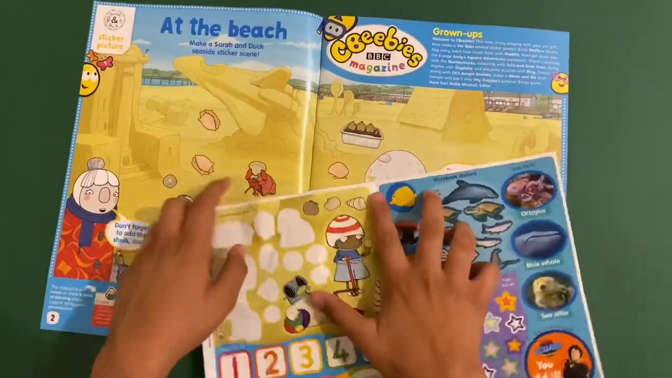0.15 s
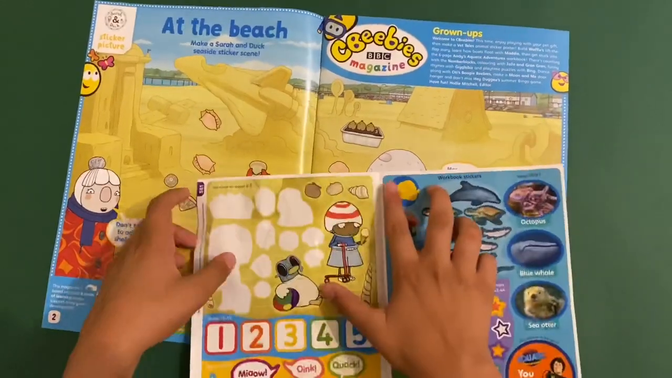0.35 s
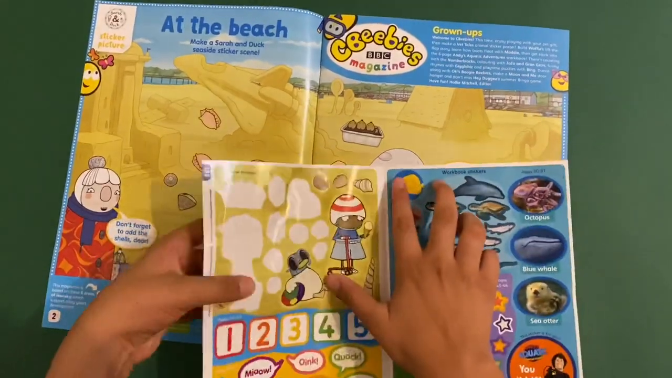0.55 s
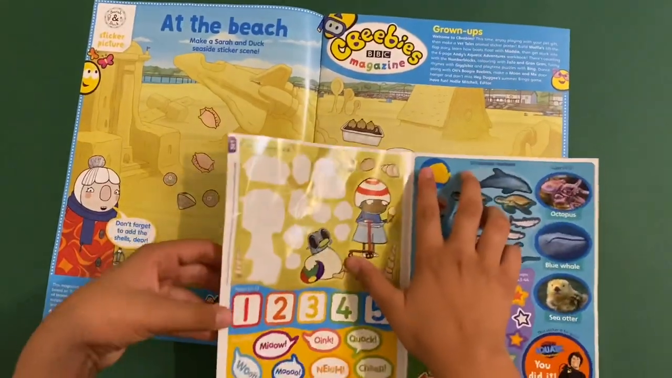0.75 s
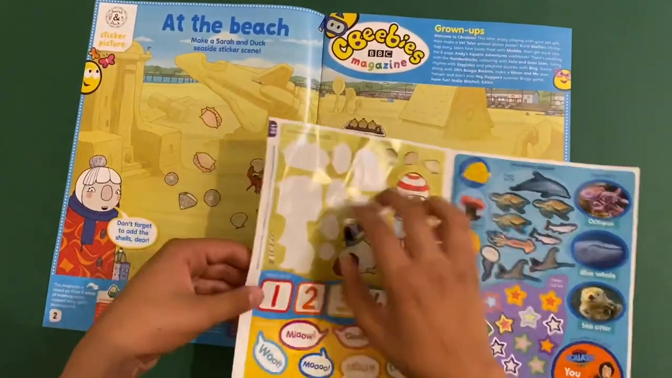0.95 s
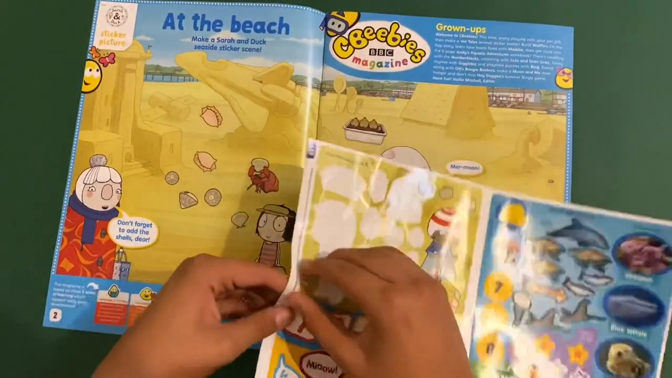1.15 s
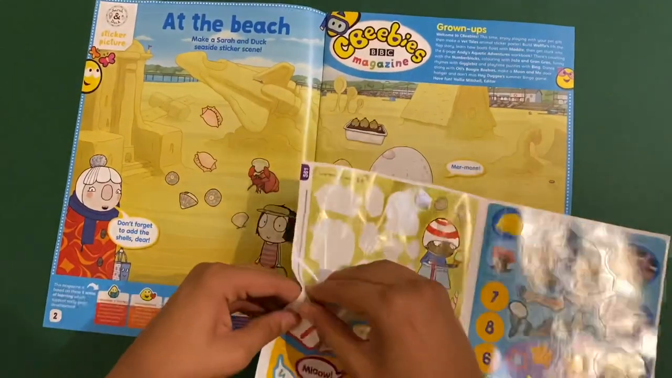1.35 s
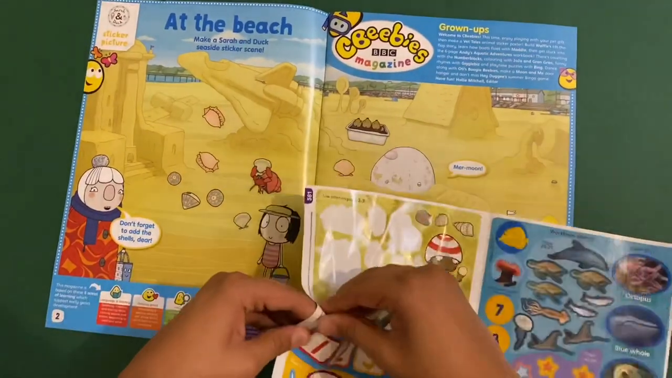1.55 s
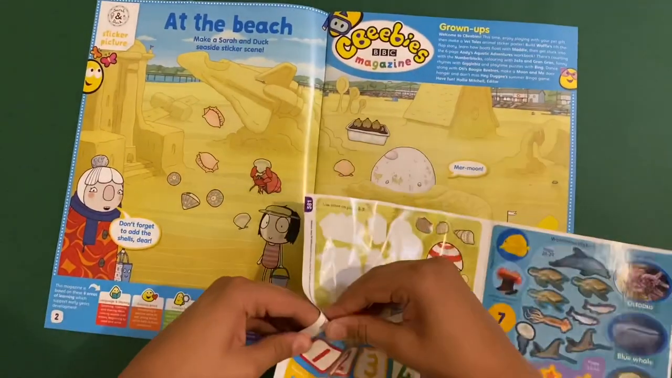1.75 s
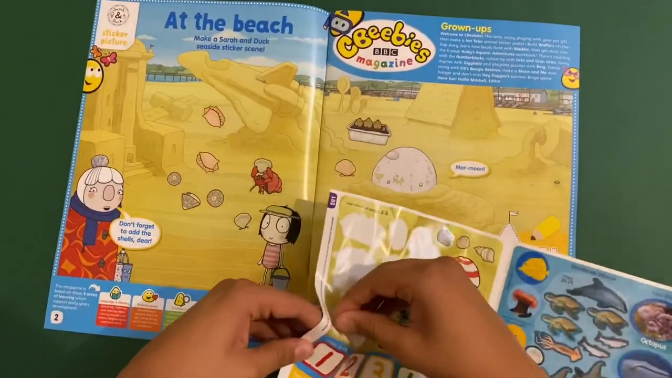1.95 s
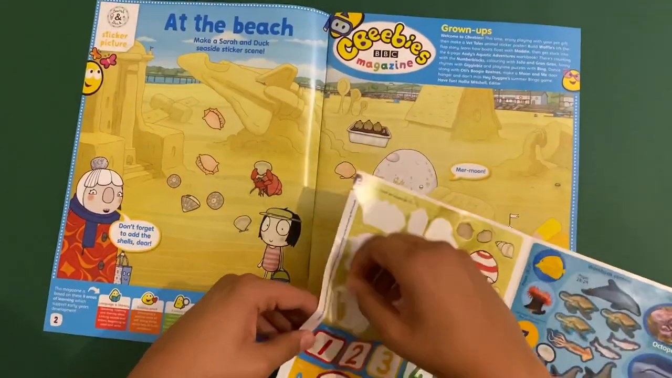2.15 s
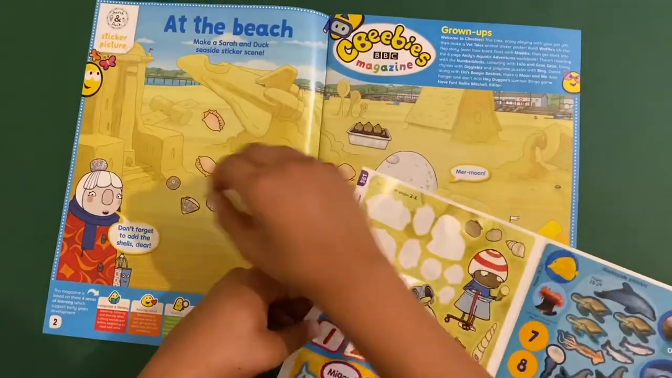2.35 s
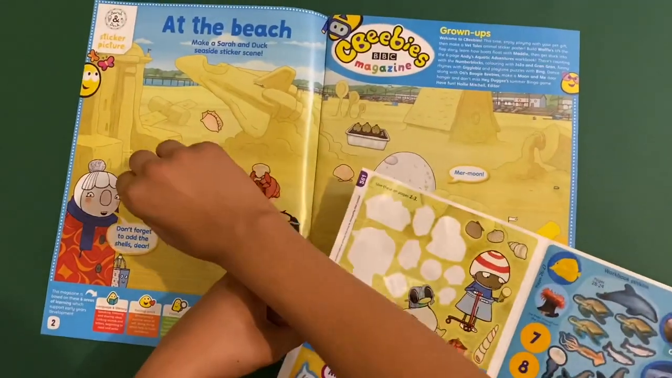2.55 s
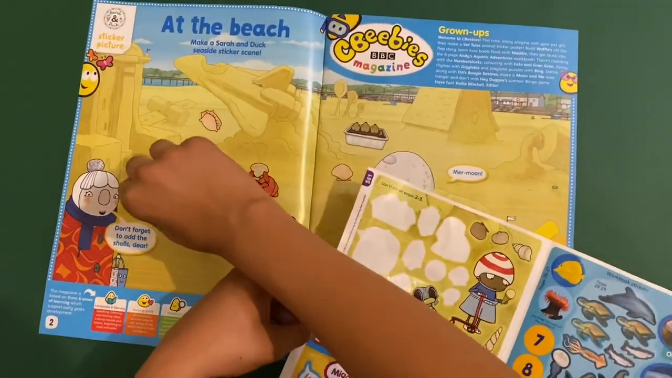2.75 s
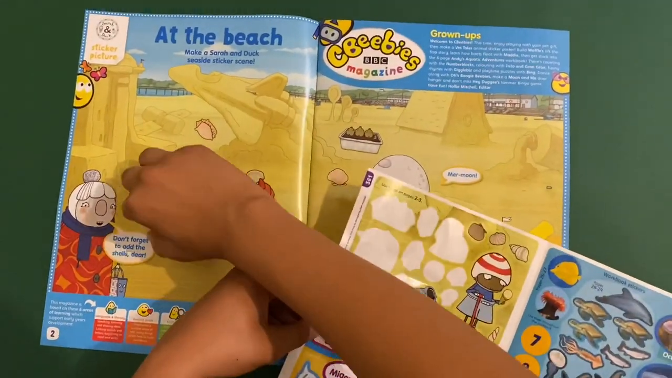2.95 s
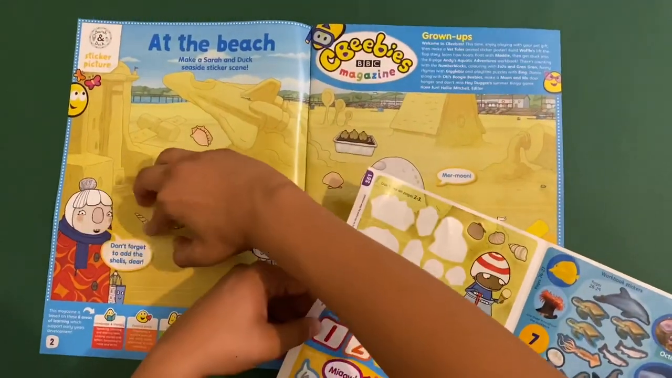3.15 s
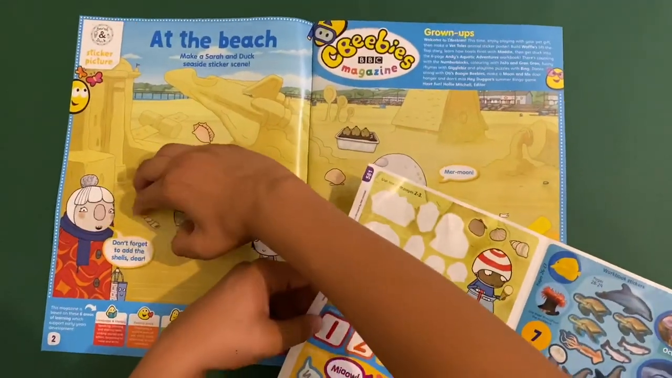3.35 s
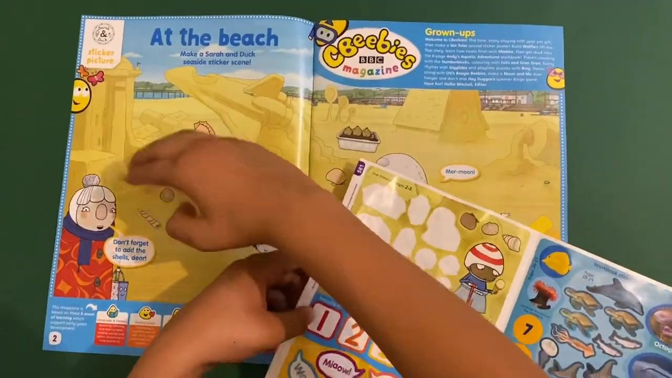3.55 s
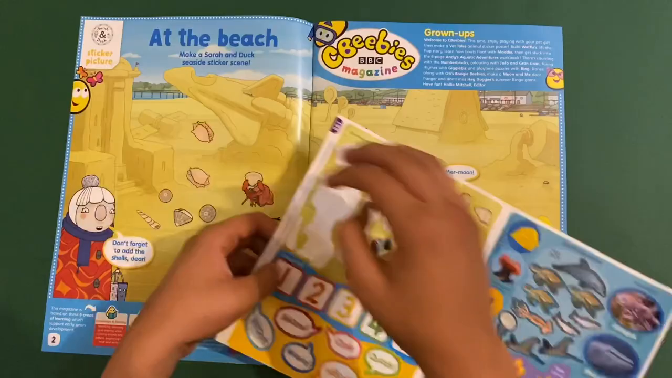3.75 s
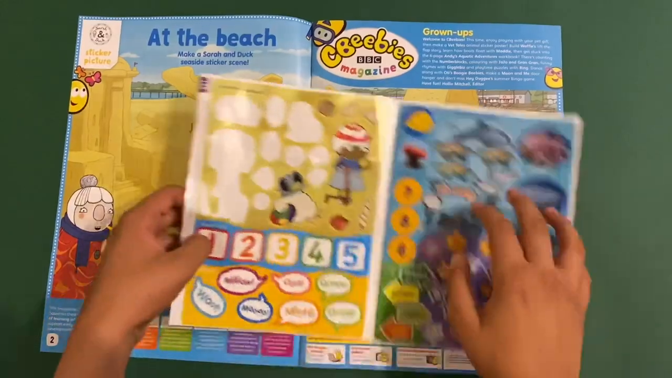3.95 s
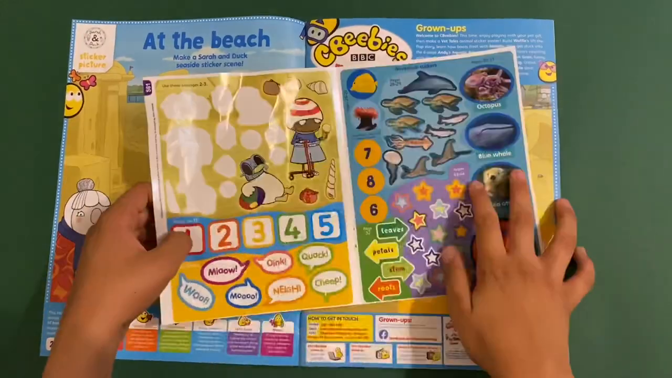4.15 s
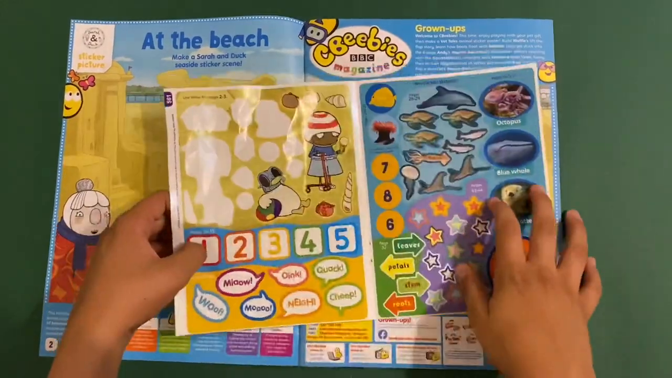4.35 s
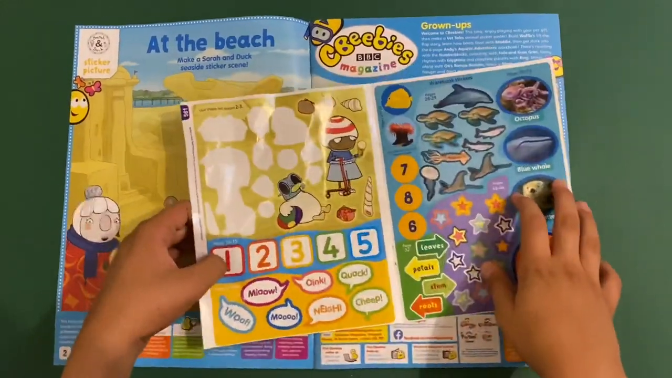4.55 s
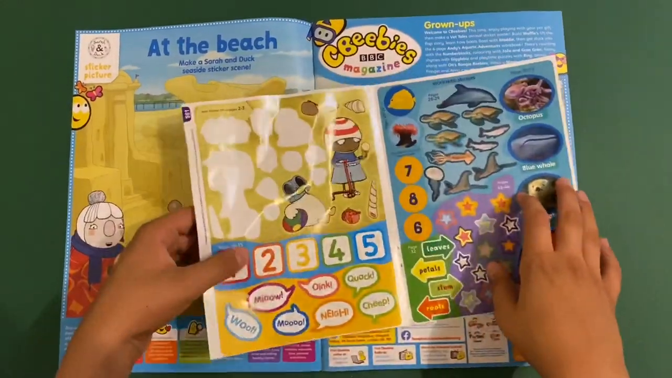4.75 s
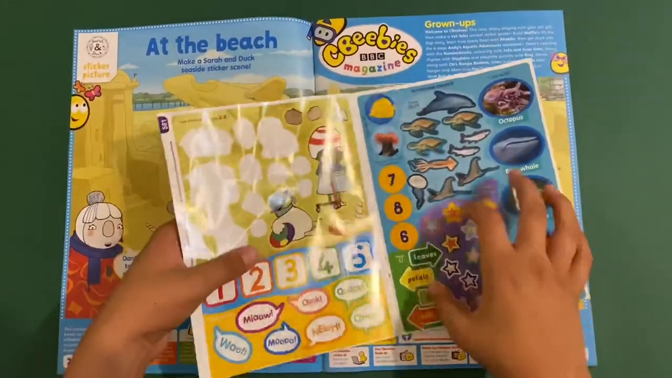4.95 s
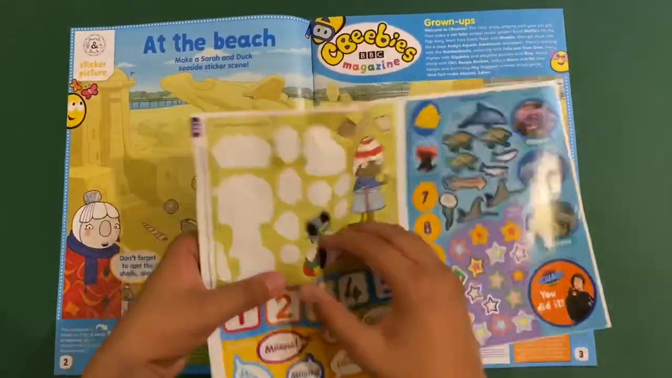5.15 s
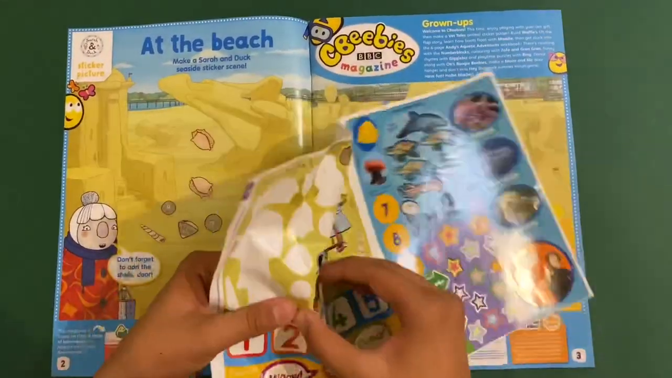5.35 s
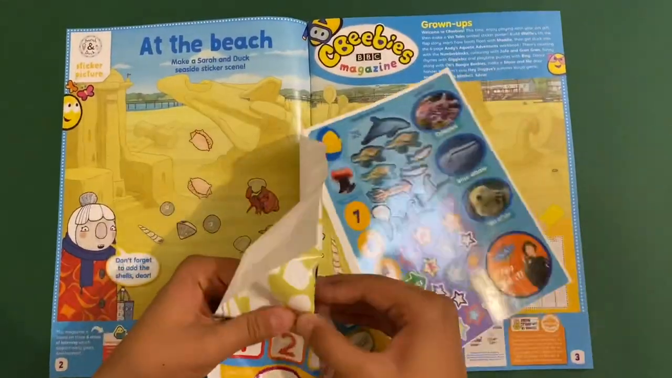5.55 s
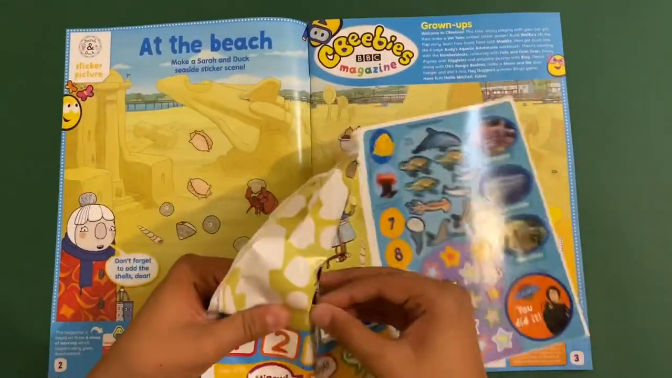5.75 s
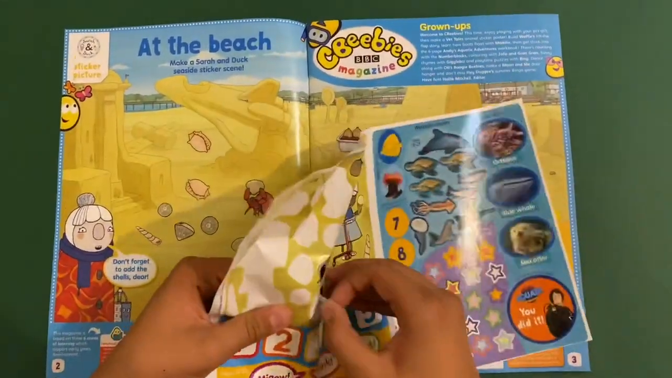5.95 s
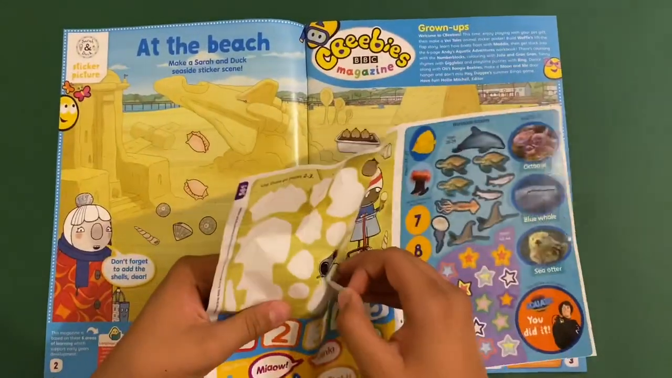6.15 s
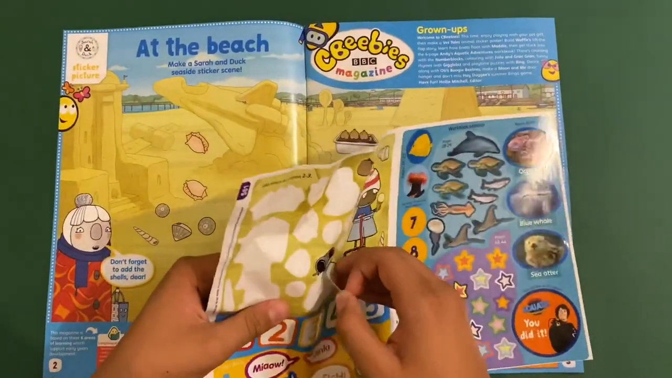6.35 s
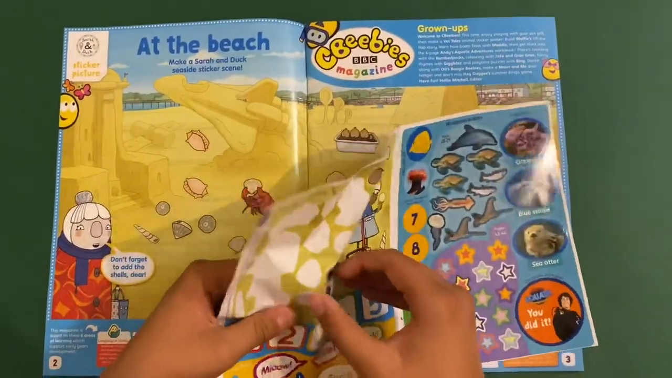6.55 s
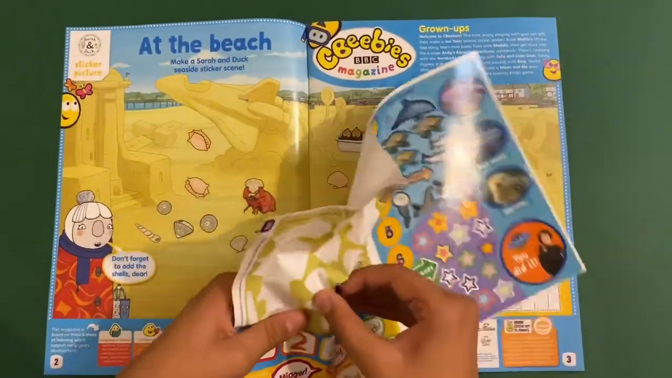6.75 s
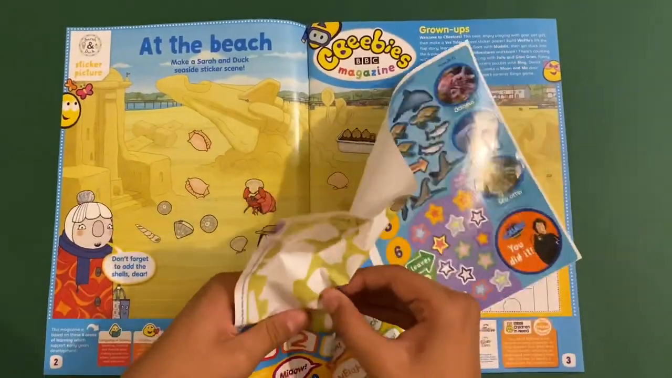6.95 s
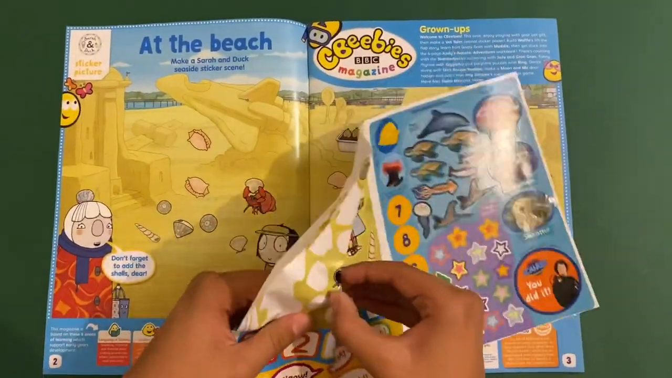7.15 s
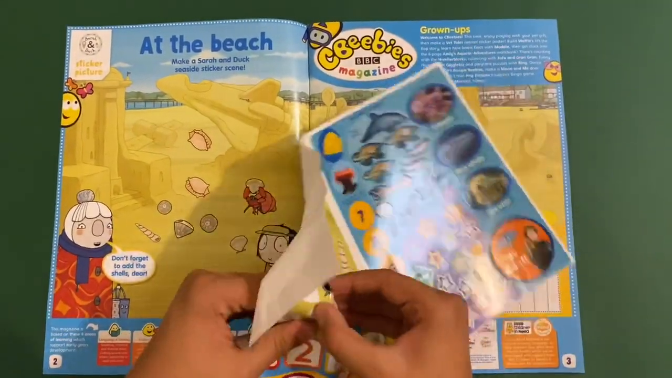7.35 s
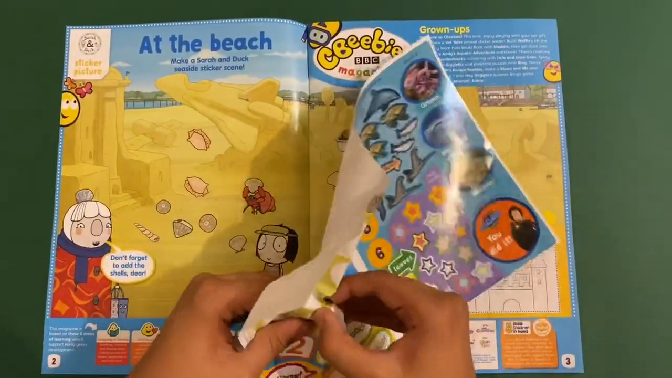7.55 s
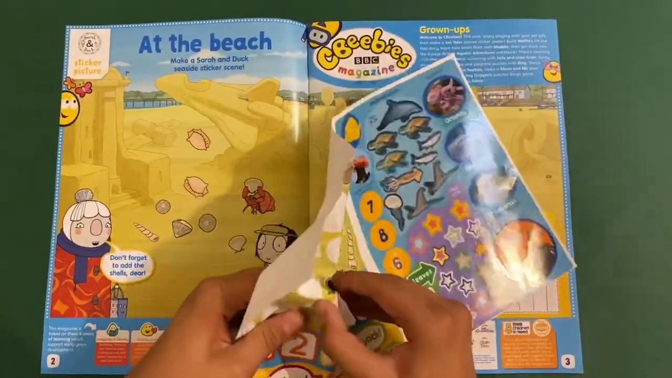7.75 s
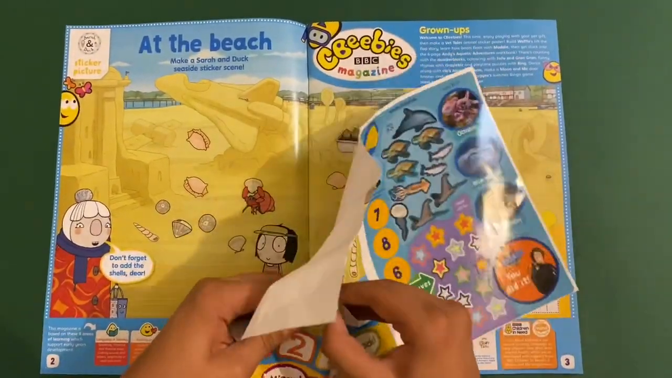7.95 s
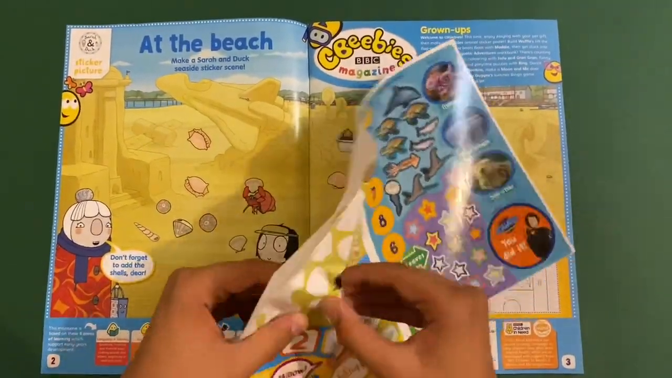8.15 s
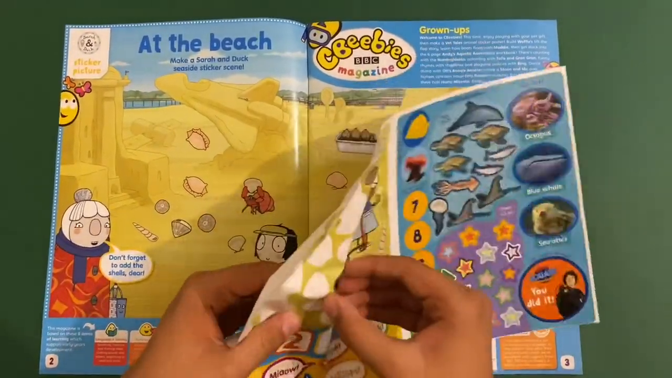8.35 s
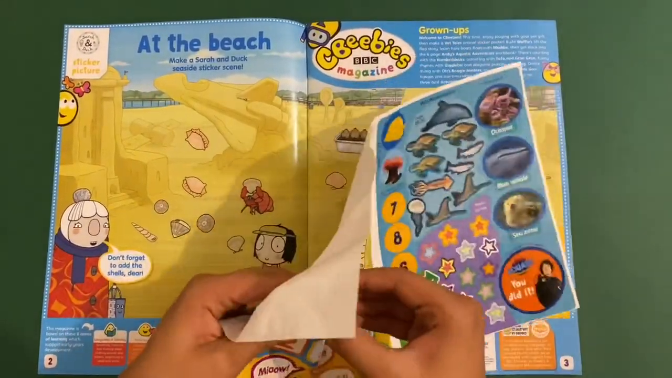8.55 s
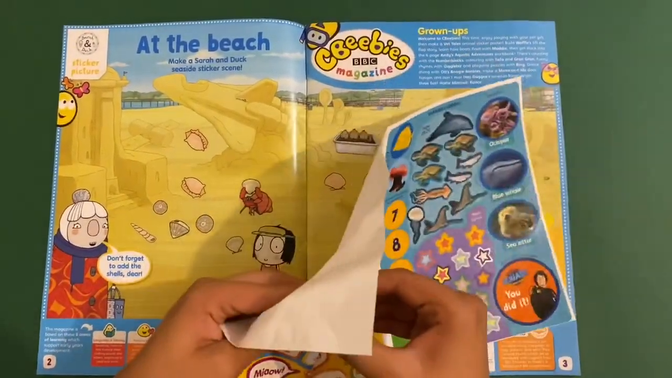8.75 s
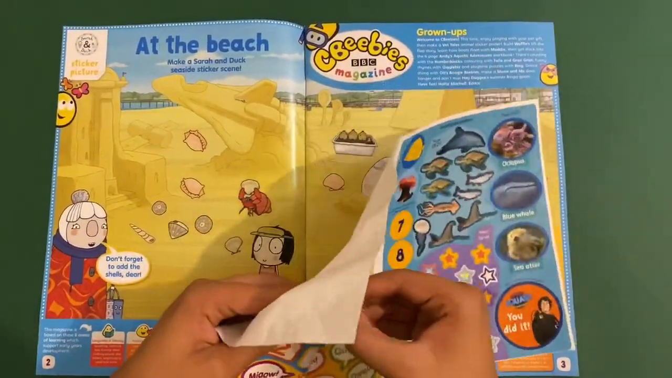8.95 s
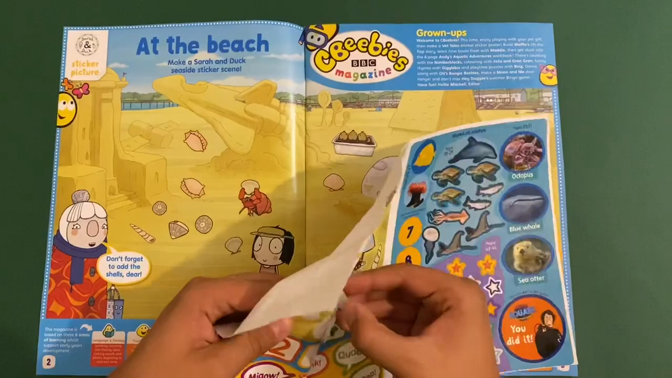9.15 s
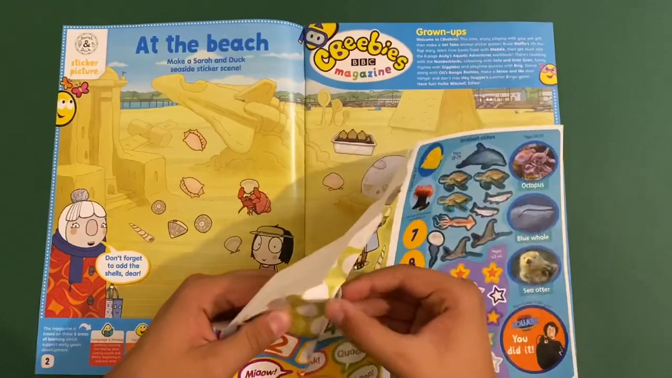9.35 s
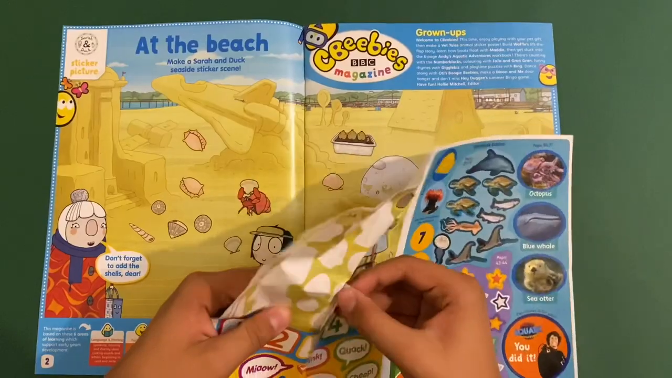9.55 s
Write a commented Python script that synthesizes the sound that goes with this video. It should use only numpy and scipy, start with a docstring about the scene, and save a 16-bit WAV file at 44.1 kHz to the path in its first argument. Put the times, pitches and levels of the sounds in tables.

```python
"""Sticker sheet over a magazine

Hands slide a glossy sticker sheet over an open magazine on a table, peel a sticker, rub it down and pick at the next.
Kinks in the bent sheet snap and flap as short noisy kicks; stick-slip pulse trains creak; thumps are damped swings.
Sliding, scuffing and rubbing are coloured noise with grains. A low rumble and the room's hush lie beneath.
Heard close, in a small quiet room, in stereo whose left and right differ in phase."""
import sys
import numpy as np
from scipy import signal
from scipy.fft import rfft, irfft, next_fast_len
from scipy.io import wavfile

SR = 44100
rng = np.random.default_rng(int(sys.argv[2]) if len(sys.argv) > 2 else 0)


def dump_mix(stems):
    """Bounce the given channels to the path in sys.argv[1] as a 16-bit WAV at rate SR."""
    frames = np.atleast_2d(stems).T  # one column per channel
    limited = np.clip(frames, -1, 1)  # hard clip at full scale
    pcm = np.round(limited * 32767).astype(np.int16)
    wavfile.write(sys.argv[1], SR, pcm)


N = 427750

# the sheet buckles: (t/s, flap level/dB, flap f/Hz, crack level/dB), levels before the trims in snaps()
SNAPS = [(0.0336, -46.5, 1800, -48.5), (0.142, -65, 1910, -65), (0.4131, -46.5, 2700, -62),
         (0.424, -39, 2320, -36.5), (0.4386, -40.5, 1930, -38), (0.445, -52, 1670, -45),
         (0.779, -73, 2510, -39.5), (1.0271, -31.5, 1230, -20.5), (1.137, -61, 1080, -64),
         (1.1716, -45.5, 900, -56), (1.277, -67, 1040, -87), (1.3095, -62, 1214, -78),
         (1.8619, -50, 1780, -38.5), (1.9835, -51.5, 1470, -46.5), (2.128, -64, 2200, -35.5),
         (2.136, -49.5, 2440, -35.5), (2.576, -64, 600, -73), (2.776, -72, 1400, -71),
         (2.901, -63, 480, -68), (3.16, -73, 480, -84), (3.299, -66, 560, -68), (3.422, -57.5, 530, -68),
         (3.454, -59.5, 474, -72), (3.774, -57, 1820, -66), (3.891, -59, 1580, -61),
         (4.858, -58.5, 1230, -51), (4.93, -54, 980, -73), (4.9632, -48.5, 1200, -47.5),
         (5.0872, -47, 1320, -57), (5.113, -36, 1010, -44.5), (5.141, -40.5, 1350, -53.5),
         (5.2197, -39.5, 1010, -44.5), (5.2516, -23, 1245, -13), (5.383, -62, 1180, -51),
         (5.5005, -47, 1010, -85), (5.6516, -51.5, 1140, -50), (5.9134, -49.5, 910, -71.5),
         (5.9332, -54, 1350, -50), (5.948, -49.5, 1500, -41), (6.005, -59.5, 2160, -48),
         (6.095, -47.5, 1210, -38), (6.139, -40.5, 915, -53.5), (6.16, -48, 1410, -39),
         (6.183, -42, 1010, -60), (6.243, -58, 1370, -46), (6.431, -43.5, 1280, -39.5),
         (6.5076, -41, 1210, -37.5), (6.6272, -59.5, 1760, -45), (6.662, -41, 1620, -40),
         (6.679, -42.5, 1270, -40), (6.6875, -34, 1110, -23.5), (6.702, -47, 900, -51),
         (6.715, -43.5, 1300, -59), (6.91, -37, 1190, -45), (6.997, -44.5, 805, -58),
         (7.024, -54, 1390, -44.5), (7.133, -57.5, 1013, -60), (7.286, -37.5, 1990, -38),
         (7.32, -40.5, 1840, -39), (7.344, -50.5, 1420, -59), (7.5827, -35.5, 2360, -15.5),
         (7.622, -37.5, 1480, -46), (7.6452, -35.5, 710, -51), (7.7506, -57, 1100, -50.5),
         (7.88, -61, 1410, -72), (7.9199, -55, 1270, -66), (7.939, -60, 1500, -60),
         (7.972, -54.5, 1300, -52.5), (8.058, -46.5, 1470, -42.5), (8.13, -45, 1280, -50),
         (8.146, -40, 1110, -51), (8.1613, -52, 1360, -34), (8.212, -48, 1080, -46),
         (8.256, -50.5, 1060, -57), (8.278, -50, 1180, -65), (8.312, -36.5, 1090, -33.5),
         (8.3195, -51, 1400, -33), (8.446, -61.5, 900, -66), (8.5302, -42.5, 2080, -35),
         (8.553, -40, 1380, -32.5), (8.562, -32.5, 1320, -22), (8.63, -53, 740, -52),
         (8.6802, -53, 1243, -46.5), (8.709, -59, 1690, -56), (8.862, -58.5, 930, -68),
         (9.0542, -43, 1490, -48), (9.093, -59, 1300, -70), (9.133, -54.5, 1580, -51),
         (9.17, -61, 1114, -55), (9.1836, -58.5, 2450, -54), (9.446, -64, 1830, -52),
         (9.53, -56.5, 1810, -57.5), (9.5573, -53, 2080, -34), (9.5783, -69, 2140, -33.5),
         (9.606, -44, 1290, -36.5), (9.645, -51.5, 1130, -61), (9.6655, -47, 1040, -38)]
# colour of a crack: (f/Hz, level/dB)
CRACK_COLOUR = [(1250, -23.5), (2350, -5.5), (3150, -7), (4150, 4), (5300, -7.5), (7600, -10.5),
                (10100, -9.5), (12400, -14), (15400, -14)]
CRACK_S, AFTERSHOCKS_PER_S = 0.0013, 450
# grit and bounce grow with a kink's level, from this level over this range
SMALL_KINK_DB, KINK_RANGE_DB = -68.5, 23.5


def snaps(flutter_s=0.01, flutter_db=-18, bounce_s=0.0039, bounce_db=-8, side_db=-8, flap_db=3.0, crack_db=-3.0):
    """A kink jumps: crack and flap run through the sheet, crackle on and bounce off the table, more so if big."""
    out = np.zeros((2, N))
    t = np.arange(int(.04 * SR)) / SR
    level_scale = np.sqrt(.007 / .04)  # unit power over 40 ms becomes unit power over 7 ms
    chance = AFTERSHOCKS_PER_S / SR
    for s, level, hz, crack in SNAPS:
        big = np.clip((max(level, crack) - SMALL_KINK_DB) / KINK_RANGE_DB, .3, 1)
        grit_share = .6 * big  # share of power; the rest is one clean kick
        aftershocks = (rng.random(len(t)) < chance) / np.sqrt(chance) * np.exp(-t / flutter_s)
        decay = np.exp(-t / CRACK_S) + from_db(flutter_db) * aftershocks
        grit = rng.standard_normal((2, 2, len(t))) * decay  # (crack or flap, mid or side, time)
        force = grit / np.linalg.norm(grit, axis=-1, keepdims=True)
        force[:, 0] *= np.sqrt(grit_share)
        force[:, 0, 0] += np.sqrt(1 - grit_share)
        lag = int(bounce_s * rng.uniform(0.6, 1.4) * SR) + 1
        force[..., lag:] += big * from_db(bounce_db) * force[..., :-lag]
        sharp, soft = force
        # each crack has a ring of its own
        sharp = sharp + 2 * resonance(sharp, rng.uniform(3000, 10000), 350)
        tick = from_db(crack + crack_db) * mid_side(coloured(sharp, CRACK_COLOUR), side_db)
        body = from_db(level + flap_db) * mid_side(flap(soft, hz), side_db)
        add(out, s, level_scale * bent(tick + body))
    return out


# the soft paper damps the push of a flap above this
PAPER_CUT_HZ = 2250


def flap(force, hz, ring_db=-9, ring_width_hz=110, sheet_db=-10):
    """A small kink flaps higher than a wide one; it rings at its own pitch and stirs the whole sheet."""
    push = resonance(force, hz, .7 * hz)
    push = signal.sosfilt(signal.butter(4, PAPER_CUT_HZ, fs=SR, output="sos"), push)
    own_ring = from_db(ring_db) * rms_one(resonance(push, hz, ring_width_hz))
    sheet_ring = from_db(sheet_db) * rms_one(sheet(push))
    return rms_one(high_pass(rms_one(push) + (own_ring + sheet_ring), min(0.25 * hz, 420)))


# resonances of the held sheet: (f/Hz, width/Hz, level/dB)
SHEET_MODES = [(527, 160, 10.5), (692, 76, 2.5), (878, 68, 1.5), (1470, 28, -5), (1480, 110, -21),
               (2020, 300, -5)]


def sheet(force):
    """The sheet's resonances ring side by side, with alternating signs."""
    return sum((-1) ** k * from_db(db) * resonance(force, hz, width)
               for k, (hz, width, db) in enumerate(SHEET_MODES))


# the arched sheet's main resonance, higher when bent tighter: (t/s, f/Hz)
ARCH = [(0, 1637), (3.749, 1900), (4.9, 1290), (5.6, 1475), (6.101, 900), (7.0, 870), (7.25, 1539),
        (7.89, 1382), (8.27, 1037), (8.5, 1380), (8.879, 965), (9.18, 1350)]


def arch(force, start=0, width_hz=260):
    """The gliding resonance of the arched sheet, driven from time start on."""
    hz = np.interp(start + np.arange(force.shape[-1]) / SR, *np.transpose(ARCH))
    turn = np.exp(2j * np.pi * np.cumsum(hz) / SR)
    # shift the glide down to 0 Hz, smooth it there, shift it back
    smooth = signal.lfilter([1], [1, -np.exp(-np.pi * width_hz / SR)], force / turn + 1e-18)
    ringing = turn * smooth
    return rms_one(high_pass(ringing.real, 440))


# scale of a bending wave's travel time, taken at 1 kHz
TRAVEL_S = 0.002


def bent(x):
    """A bending wave crosses the sheet: treble arrives first, so a click becomes a quick falling chirp."""
    hz = bins_of(x)
    # delay falls as 1 / sqrt(f) and is zero at the top frequency
    turns = TRAVEL_S * (2 * np.sqrt(1000 * hz) - hz * np.sqrt(2000 / SR))
    return filtered(x, -2j * np.pi * turns)


# paper or glue catches and slips, levels before the trims in drags():
# (start t/s, end t/s, sheet level/dB, sheet f/Hz, crackle level/dB, slips per s, irregularity 0-1)
DRAGS = [(0.4216, 0.452, -50.5, 1600, -36.5, 384, 0.38), (3.405, 3.458, -70.5, 900, -68, 135, 0.41),
         (5.114, 5.16, -43, 780, -52, 190, 0.55), (6.108, 6.201, -48.5, 900, -36, 480, 0.42),
         (6.66, 6.722, -49.5, 880, -45, 290, .5), (6.946, 7.002, -48.5, 825, -55, 235, 0.05),
         (7.625, 7.656, -46, 770, -68, 320, 0.65), (8.56, 8.591, -45, 900, -39, 570, 0.64)]
SLIP_S = 0.0008


def drags(speed_up=0.35, arch_db=-3, side_db=-7, sheet_db=4.0, crackle_db=-12.0):
    """Stick and slip: a quickening run of tiny releases drives the sheet; uneven runs crackle, even ones creak."""
    out = np.zeros((2, N))
    for start, end, body, hz, crackle, per_s, irregular in DRAGS:
        length = max(end - start, .005)
        t = np.arange(int((length + .02) * SR)) / SR
        gaps = np.exp(irregular * rng.standard_normal(200))
        progress = np.cumsum(per_s * (1 + speed_up * (t / length - .5))) / SR
        turns = np.searchsorted(np.cumsum(gaps), progress)
        sizes = from_db(10.0 * irregular * rng.standard_normal(len(t)))
        slips = np.diff(turns, prepend=-1) * (t < length) * sizes
        slip_decay = signal.lfilter([1], [1, -np.exp(-1 / (SLIP_S * SR))], slips)
        grit = rms_one(slip_decay * rng.standard_normal((2, len(t))))
        force = rms_one(slips) * [[1], [0]] + irregular * grit
        whole_sheet = rms_one(sheet(force)) + from_db(arch_db) * arch(force, start)
        ringing = flap(force, hz, ring_db=-12) + irregular * whole_sheet
        creak = from_db(body + sheet_db) * mid_side(ringing, side_db)
        fizz = high_pass(resonance(grit, 2000, 5400), 1100)
        fizz = from_db(crackle + crackle_db) * mid_side(fizz, side_db)
        # level holds over the drag itself, without its tail
        add(out, start, np.sqrt(length / t[-1]) * bent(creak + fizz))
    return out


# the sheet or a hand lands and pushes air: (t/s, f/Hz, peak level/dB before trim and table)
THUMPS = [(0.429, 116, -39.5), (0.452, 111, -40.5), (1.031, 508, -25.5), (1.035, 123, -41),
          (2.152, 67.4, -49), (2.305, 75, -54), (3.45, 267, -52.5), (3.992, 99.6, -49.5), (4.487, 270, -50),
          (4.5, 82.4, -53), (4.927, 199, -40), (4.969, 224, -44.5), (5.12, 109.3, -33.5), (5.148, 159, -38),
          (5.2535, 609, -15), (5.913, 154, -56), (6.511, 513, -28.5), (6.688, 214, -35), (7.63, 204, -44),
          (8.214, 142, -42.5), (8.315, 165.5, -32), (8.536, 194, -31.5), (8.554, 187.5, -27)]
# the table rings under a thump: (f/Hz, width/Hz, level/dB)
TABLE_MODES = [(85, 30, -0.5), (159, 17, -11.5), (207, 39, -7.5)]


def thumps(rise_cycles=0.55, decay_cycles=1.5, level_db=-3.0, side_db=-17, low_hz=42):
    """A soft push of air, a few damped swings at neighbouring pitches, sets the table ringing."""
    out = np.zeros((2, N))
    t = np.arange(int(.12 * SR)) / SR
    for s, hz, db in THUMPS:
        swings = sum(weight * np.sin(2 * np.pi * (hz * ratio * t + rng.random((2, 1))))
                     for ratio, weight in [(.62, 0.38), (1, 1), (1.4, 0.42), (2.1, .25)])
        puff = swings * (1 - np.exp(-t * hz / rise_cycles)) * np.exp(-t * hz / decay_cycles)
        add(out, s, from_db(db + level_db) * puff / abs(puff).max() * from_db([[0], [side_db]]))
    table_ring = sum(from_db(db) * resonance(out, hz, width) for hz, width, db in TABLE_MODES)
    return high_pass(out + table_ring, low_hz)


# a hand moves the sheet:
# (start t/s, end t/s, level/dB of the glossy faces' hiss, level/dB of the fingers' scuff)
STROKES = [(-0.03, 0.152, -54, -68.5), (0.132, 0.42, -60, -72), (0.505, 0.724, -53.5, -99),
           (0.72, 0.876, -51.5, -91), (0.89, 0.976, -62.5, -100), (0.962, 1.07, -49, -66.5),
           (1.209, 1.225, -55, -72), (1.337, 1.619, -69.5, -82), (1.693, 1.848, -58, -80),
           (1.83, 2.162, -59.5, -66.5), (2.168, 2.364, -65, -78.5), (2.555, 2.669, -69.5, -71.5),
           (2.733, 2.981, -71, -72.5), (3.157, 3.334, -75, -77.5), (3.379, 3.66, -58, -81),
           (3.646, 3.753, -48.5, -71), (3.753, 3.893, -52.5, -92), (3.92, 4.046, -55, -68.5),
           (4.098, 4.573, -54.5, -69), (4.55, 4.675, -65.5, -72), (4.703, 4.79, -50, -70),
           (4.818, 5.137, -57.5, -59.5), (5.386, 5.606, -76.5, -68), (5.564, 5.751, -61, -64.5),
           (5.804, 5.92, -70, -75), (5.888, 6.057, -60.5, -71.5), (6.072, 6.19, -41.5, -52.5),
           (6.365, 6.448, -61, -59.5), (6.6, 6.756, -58, -56), (6.76, 6.92, -79, -69),
           (6.908, 7.031, -50, -52), (7.044, 7.23, -71.5, -69), (7.207, 7.588, -60, -60.5),
           (7.305, 7.397, -56.5, -56.5), (7.596, 7.621, -37, -64), (7.809, 7.937, -71.5, -68.5),
           (7.888, 8.047, -62, -59), (8.008, 8.286, -52.5, -57.5), (8.378, 8.503, -71, -64.5),
           (8.588, 8.837, -67, -59), (8.827, 8.964, -57, -55.5), (8.96, 9.185, -70, -64),
           (9.313, 9.54, -79, -70), (9.503, 9.697, -53.5, -59)]
# a short noisy room tail dies away after each snap: its hiss follows the crack, its scuff the flap
TAIL_S, TAIL_HISS_DB, TAIL_SCUFF_DB = 0.038, -18, -13


def hiss_and_scuff_gains():
    """Gains of hiss and scuff: the hands' strokes plus the short room tail after each snap."""
    hiss = np.hypot(movements([(start, end, db) for start, end, db, _ in STROKES]),
                    snap_tails([(s, crack + TAIL_HISS_DB) for s, _, _, crack in SNAPS]))
    scuff = np.hypot(movements([(start, end, db) for start, end, _, db in STROKES]),
                     snap_tails([(s, level + TAIL_SCUFF_DB) for s, level, _, _ in SNAPS]))
    return hiss, scuff


# colour of the sliding glossy faces: (f/Hz, level/dB)
SLIDE_COLOUR = [(300, -16), (650, -23), (1000, -9.5), (1600, -10), (2300, -3), (3000, -1), (3600, -4),
                (4300, 1), (5300, -3), (6500, -5.5), (9000, -8), (12000, -12), (15500, -19.5)]


def slide(gain):
    """Glossy faces slide on each other: a dense, wide hiss."""
    return friction(gain, SLIDE_COLOUR, grains_per_s=2200, grain_share=0.22, waver_db=1.8, side_db=3.5, low_hz=212)


# colour of the scuffing fingers: (f/Hz, level/dB)
SCUFF_COLOUR = [(150, 2), (350, -1.5), (470, -7.5), (600, 6.5), (730, 1.5), (900, 4), (1150, -1),
                (1450, -1), (2400, -3), (3000, 3), (4000, -1.5), (6000, -22.5), (10500, -23), (14000, -39)]


def scuff(gain):
    """Fingers scuff the sheet: a lower sound with sparser grains."""
    rough = friction(gain, SCUFF_COLOUR, grains_per_s=450, grain_share=0.18, waver_db=2.5, side_db=-4.5, low_hz=148)
    return from_db(-1.5) * rough


def hollow(gain):
    """Scuffing noise excites the arched sheet's gliding resonance."""
    return from_db(-6.5) * gain * mid_side(arch(rng.standard_normal((2, N))), side_db=-1)


CREASES_PER_S, CREASES_DB = 120, -5


def creases(gain, low_hz=750, high_hz=2200, side_db=-9, count=6):
    """Small creases give way at random under the fingers, each flapping at one of a few pitches."""
    sizes = from_db(rng.uniform(-18, 0, N)) * rng.choice([-1, 1], (2, N))
    gives = (rng.random(N) < CREASES_PER_S / SR) * sizes
    dealt = rng.integers(0, count, N)
    pitches = np.geomspace(low_hz, high_hz, count)
    flaps = sum(flap(gives * (dealt == k), hz) for k, hz in enumerate(pitches))
    return from_db(CREASES_DB) * gain * mid_side(bent(flaps), side_db)


# a fingertip rubs the sticker down: (start t/s, end t/s, level/dB)
RUBS = [(2.812, 2.975, -49.5)]
# colour of the rub: (f/Hz, level/dB)
RUB_COLOUR = [(300, -9.5), (500, -9), (1000, -13), (2000, -7), (3000, -7.5), (4300, -3.5), (5500, -7),
              (7000, -7), (9200, 1.5), (11500, -3.5), (15500, -14)]


def rub():
    """A fingertip rubs the sticker: bright friction noise with some grain."""
    return friction(movements(RUBS), RUB_COLOUR, grains_per_s=750, grain_share=0.15, waver_db=1.5,
                    side_db=0, low_hz=350)


def friction(gain, colour, grains_per_s, grain_share, waver_db, side_db, low_hz):
    """Countless tiny contacts merge into hiss; larger fibres catch as separate grains."""
    catches = rng.random(N) < grains_per_s * from_db(4 * drift(25)) / SR
    sizes = from_db(4.5 * np.minimum(rng.exponential(1, N), 2.4))
    grains = rms_one(catches * sizes * rng.standard_normal((2, N)))
    share = np.clip(grain_share, 0, 1)
    contact = np.sqrt(share) * grains + np.sqrt(1 - share) * rng.standard_normal((2, N))
    hiss = high_pass(coloured(over_table(contact), colour), low_hz)
    return gain * from_db(waver_db * drift(45)) * mid_side(hiss, side_db)


def over_table(x, echo=0.4, delay_s=0.0005):
    """The table reflects the moving sheet; as the gap wanders, peaks and dips wander through the hiss."""
    n = np.arange(N)
    late = n - delay_s * SR * from_db(3 * drift(7))
    return x + echo * np.array([np.interp(late, n, row) for row in x])


# an arm shifts on the table: (start t/s, end t/s, level/dB)
ARM_SHIFTS = [(2.13, 2.35, -64.5), (2.35, 2.78, -70), (2.78, 3.45, -60), (3.5, 4.08, -67),
              (4.45, 4.54, -51.5), (4.72, 5.95, -66)]


def rumble():
    """An arm shifting on the table: low noise that swells with each movement."""
    colour = [(31, 3.5), (56, -3.5), (92, -2.5), (145, -22.0), (380, -28.0), (1900, -64.5)]
    return movements(ARM_SHIFTS) * hum_of(colour, side_db=3.0)


ROOM_T60_S = 0.21


def room(x, wet_db=-10.0, first_s=0.0063, dull_t60_s=0.26, split_hz=1500):
    """Dense reflections from the walls, a little longer in the lows; energy arrives from all sides."""
    t = np.arange(int(.5 * SR)) / SR
    noise = rng.standard_normal((2, len(t))) * np.clip(t / first_s - 1, 0, 1)
    lows = signal.sosfilt(signal.butter(1, split_hz, fs=SR, output="sos"), noise)
    tail = lows * from_db(-60 * t / dull_t60_s) + (noise - lows) * from_db(-60 * t / ROOM_T60_S)
    tail = coloured(tail, [(100, 8.5), (700, -2.0), (2000, -3.0), (6000, 4.0), (10000, -2.5), (15000, 1.0)])
    tail = tail / np.sqrt(np.sum(tail ** 2))
    return from_db(wet_db) * signal.fftconvolve(x[:1], tail, axes=1)[:, :N]


# colour of the quiet room: (f/Hz, level/dB)
ROOM_TONE = [(30, -5.5), (60, 1), (90, 6), (150, -14), (300, -12.5), (600, -29.5), (1300, -19.5),
             (2500, -19.5), (4000, -21), (8000, -35), (15500, -42.5)]


def hush():
    """The room's own steady, wide, mostly low noise."""
    return from_db(-70.5) * hum_of(ROOM_TONE, side_db=7.0)


def hum_of(colour, side_db):
    """Smooth noise of a given colour."""
    return mid_side(high_pass(coloured(rng.standard_normal((2, N)), colour), 51), side_db)


# every movement gathers speed, holds it and coasts to rest
ATTACK_S, RELEASE_S = 0.045, 0.022
CONTROL_STEP_S = 0.001


def movements(rows):
    """Gain of movements (start t/s, end t/s, level/dB): attack, hold, release."""
    t = np.arange(0, N / SR, CONTROL_STEP_S)
    power = 0
    for start, end, db in rows:
        envelope = np.clip((t - start) / ATTACK_S, 0, 1) * np.exp(-np.maximum(t - end, 0) / RELEASE_S)
        power = power + (envelope * from_db(db)) ** 2
    return per_sample(np.sqrt(power))


def snap_tails(rows):
    """Gain of the short noisy room tail that dies away after each snap (t/s, level/dB)."""
    t = np.arange(0, N / SR, CONTROL_STEP_S)
    power = sum(((t > s) * from_db(db) * np.exp(-abs(t - s) / TAIL_S)) ** 2 for s, db in rows)
    return per_sample(np.sqrt(power))


def per_sample(gain):
    """A gain given at every control step, for every sample."""
    return np.interp(np.arange(N) / SR, np.arange(len(gain)) * CONTROL_STEP_S, gain)


def drift(rate):
    """Slow chance with a spread near 1: random knots, rate per second, joined by lines."""
    knots = rng.standard_normal(int(N / SR * rate) + 2)
    return np.interp(np.arange(N) * rate / SR, np.arange(len(knots)), knots)


def from_db(db):
    """Amplitude of a level in dB."""
    return 10 ** (np.asarray(db) / 20)


def rms_one(x):
    """Scales x to an RMS of one over all its rows."""
    return x / np.sqrt(np.mean(x ** 2) + 1e-20)


def mid_side(x, side_db):
    """Weights two rows as mid and side, with unit power in all."""
    x = x * from_db([[0], [side_db]])
    return x / np.sqrt(np.sum(np.mean(x ** 2, axis=1)) + 1e-20)


def add(out, s, sound):
    """Mixes a short sound in at time s."""
    start = max(round(s * SR), 0)
    out[:, start:start + sound.shape[1]] += sound[:, :N - start]


def high_pass(x, hz):
    """Second-order cut of the lows."""
    return signal.sosfilt(signal.butter(2, hz, "high", fs=SR, output="sos"), x)


def resonance(x, hz, width_hz):
    """One damped mode: a two-pole band-pass."""
    r = np.exp(-np.pi * width_hz / SR)
    poles = [1, -2 * r * np.cos(2 * np.pi * hz / SR), r * r]
    return signal.lfilter(np.array([1, 0, -1]) * (1 - r * r) / 2, poles, x + 1e-18)


def coloured(x, spectrum):
    """Minimum-phase filter: nothing sounds before its cause."""
    cepstrum = irfft(np.log(from_db(at_hz(spectrum, bins_of(x)))))
    half = len(cepstrum) // 2
    cepstrum[1:half] *= 2
    cepstrum[half:] = 0
    return filtered(x, rfft(cepstrum))


def at_hz(points, hz):
    """A table over frequency, read at hz on a log scale."""
    knots, value = np.transpose(points)
    return np.interp(np.log(hz + 1), np.log(knots), value)


def bins_of(x):
    """Frequencies of a transform long enough for x to ring out."""
    return np.linspace(0, SR / 2, next_fast_len(x.shape[-1] // 2 + 2048) + 1)


def filtered(x, log_gain):
    """Applies a complex log gain, given at each bin."""
    return irfft(rfft(x, 2 * (len(log_gain) - 1)) * np.exp(log_gain))[..., :x.shape[-1]]


# side level of the stereo image over frequency: (f/Hz, side level/dB)
SIDE_LEVEL = [(48, -7), (135, -16.5), (430, 3.5), (1450, 1), (3000, -15.5), (4100, -13), (9700, -11),
              (11100, -16.5), (12500, -35.5)]
# the sheet snaps a little left of centre: snaps' mid added to side
SNAP_LEAN = 0.028


def scene():
    """Paper sounds in the room, over the rumble of the table and the room's own hush."""
    hissing, scuffing = hiss_and_scuff_gains()
    kinks = snaps()
    paper = kinks + drags() + thumps()
    paper = paper + slide(hissing) + scuff(scuffing) + hollow(scuffing) + creases(scuffing) + rub()
    mid, side = paper + room(paper) + rumble() + hush()
    side = coloured(side, SIDE_LEVEL) + SNAP_LEAN * kinks[0]
    return np.array([mid + side, mid - side])


# phase between left and right over frequency: (f/Hz, phase/rad by which left leads)
LEFT_LEAD = [(30, 0), (250, -.1), (860, -1.1), (1250, .3), (1800, -.2), (2400, -1.3), (3100, -2.4),
             (5000, -2.6), (5500, -5.5), (7840, -4.8), (10000, -4.3), (12000, -3.5), (16000, -np.pi)]
CUTOFF_HZ = 15900


def record(dry):
    """Left and right differ in phase by a table over frequency, near opposite in the treble; the top is cut."""
    left, right = dry
    left = filtered(left, 1j * at_hz(LEFT_LEAD, bins_of(left)))
    top_cut = signal.ellip(10, .1, 80, CUTOFF_HZ, fs=SR, output="sos")
    return signal.sosfilt(top_cut, np.array([left, right]))


dry = scene()
out = record(dry)
dump_mix(out)
```